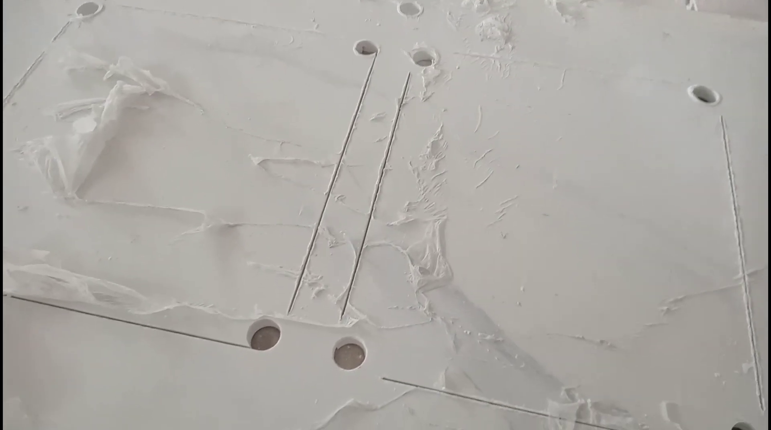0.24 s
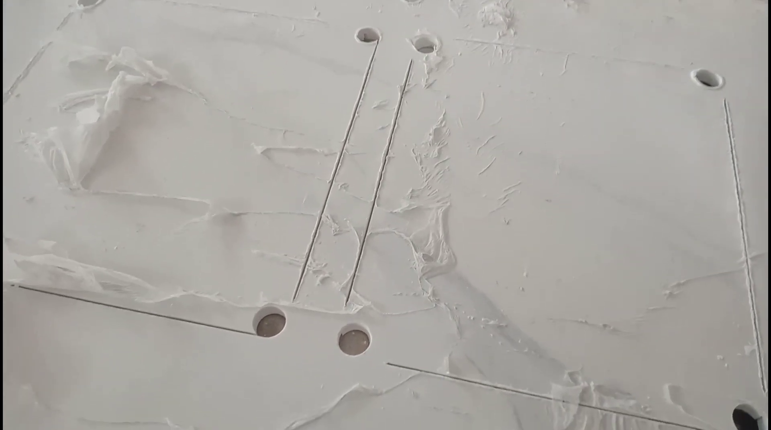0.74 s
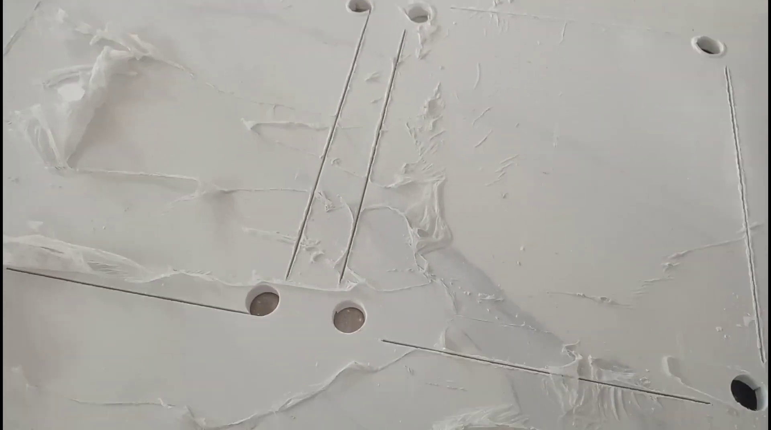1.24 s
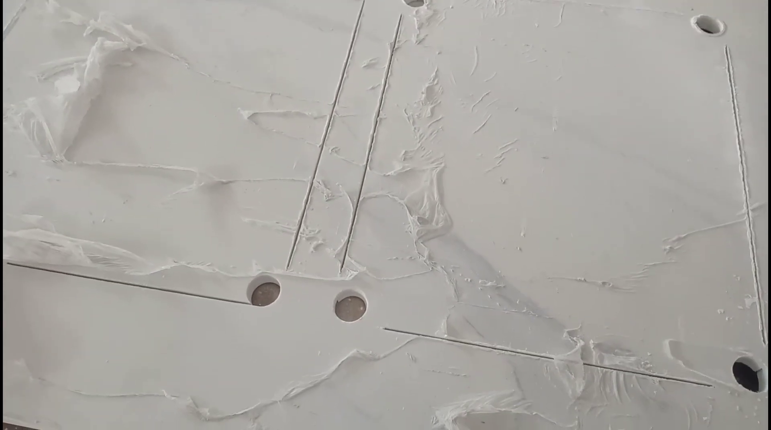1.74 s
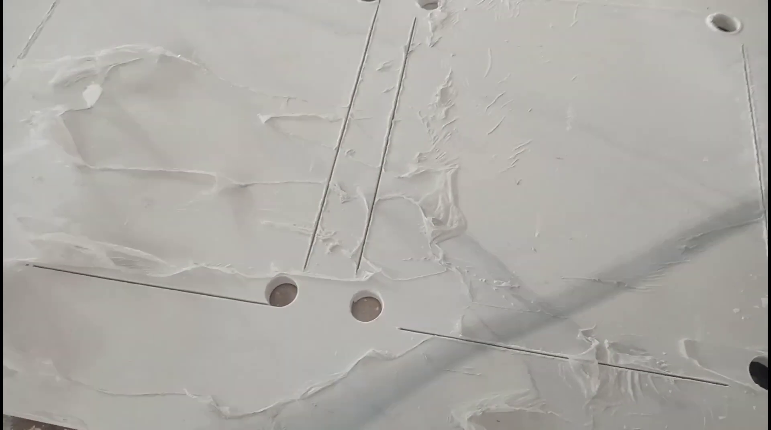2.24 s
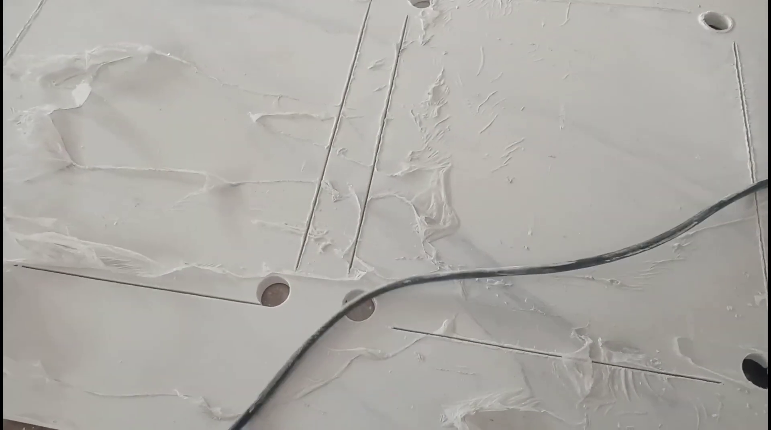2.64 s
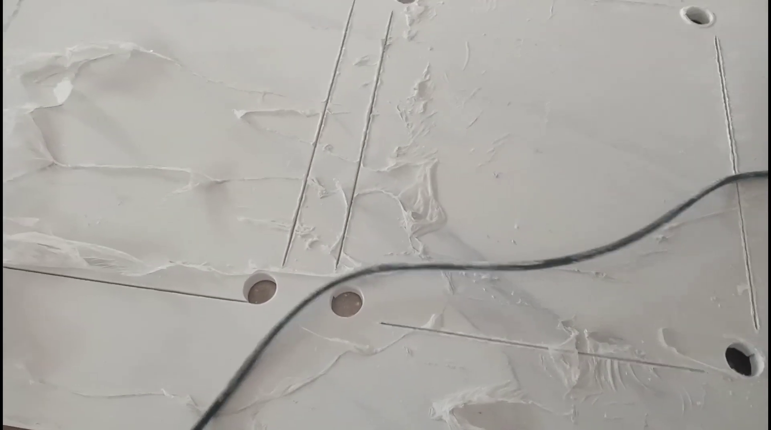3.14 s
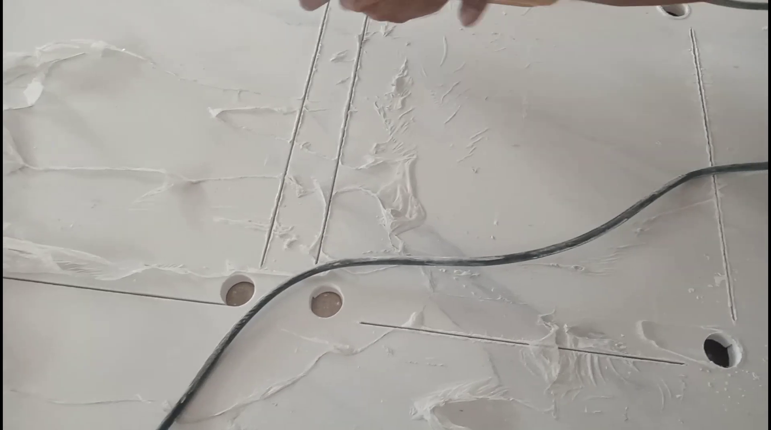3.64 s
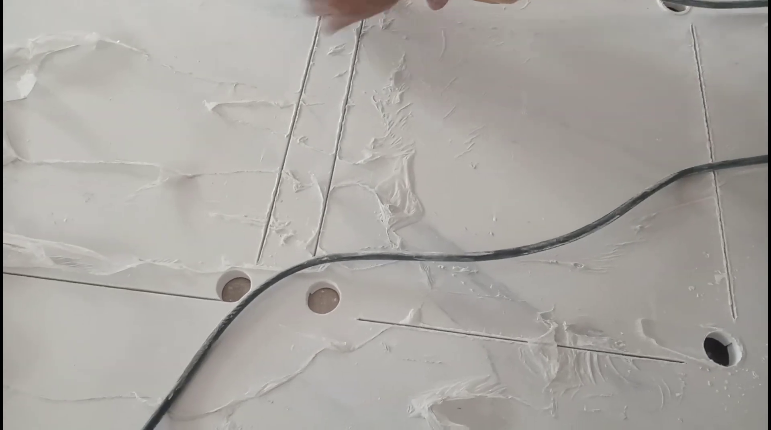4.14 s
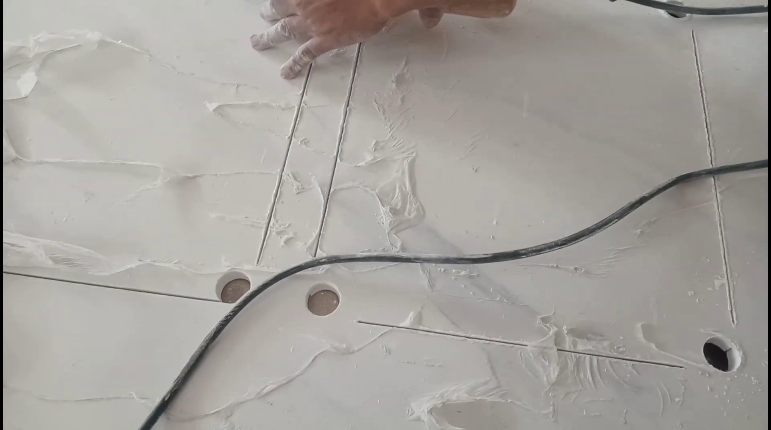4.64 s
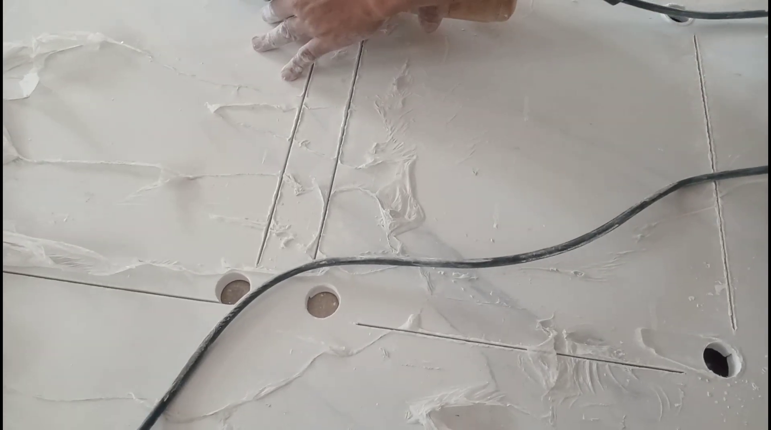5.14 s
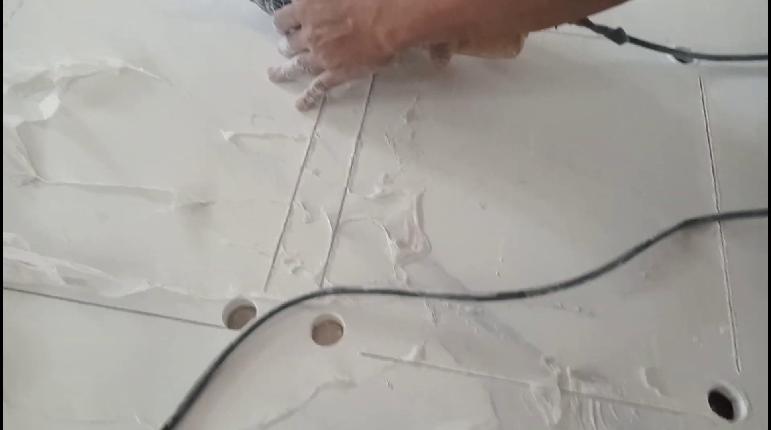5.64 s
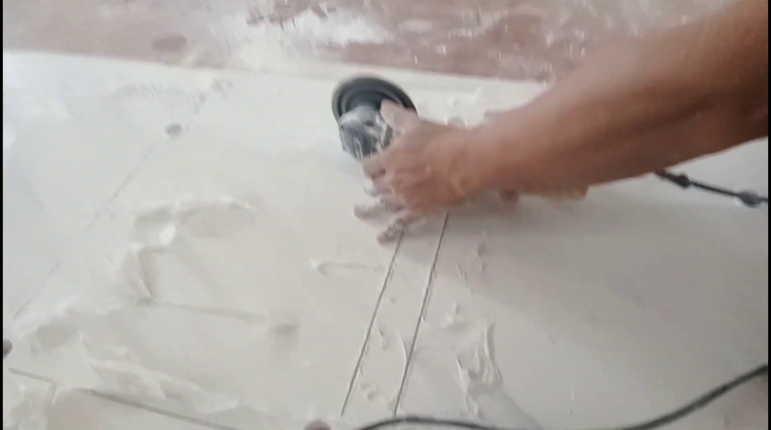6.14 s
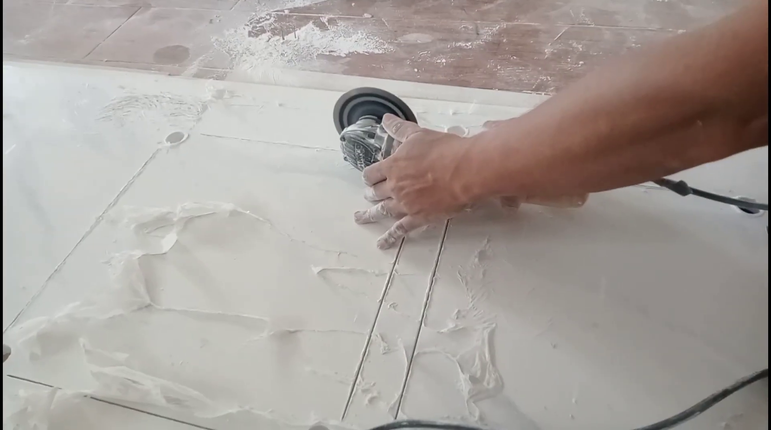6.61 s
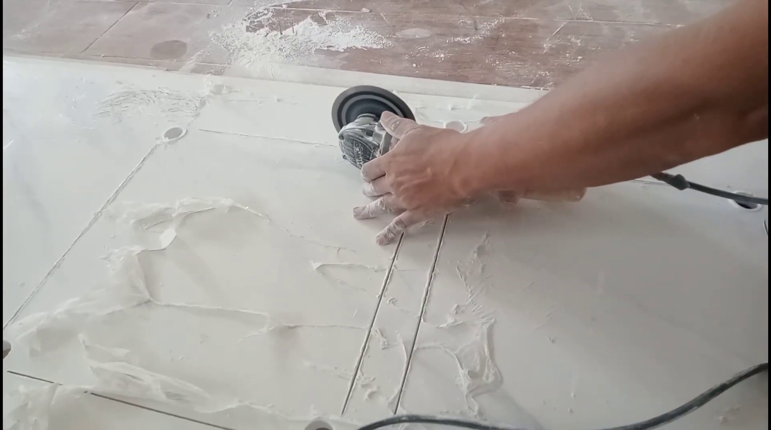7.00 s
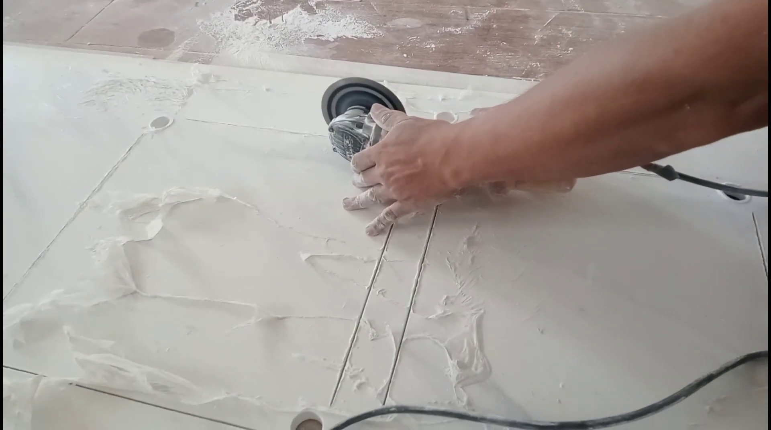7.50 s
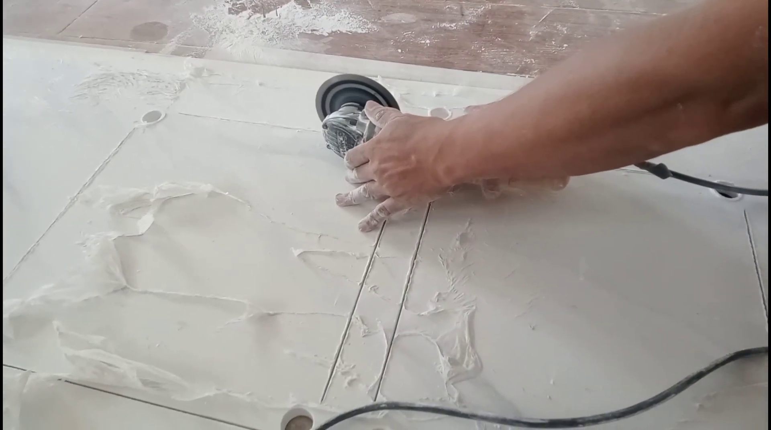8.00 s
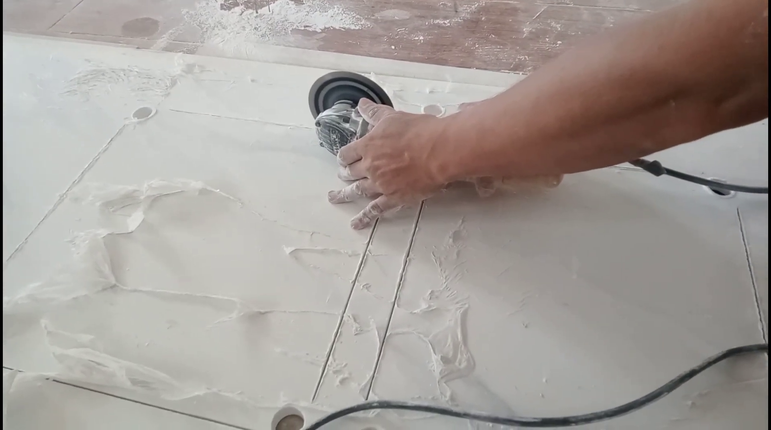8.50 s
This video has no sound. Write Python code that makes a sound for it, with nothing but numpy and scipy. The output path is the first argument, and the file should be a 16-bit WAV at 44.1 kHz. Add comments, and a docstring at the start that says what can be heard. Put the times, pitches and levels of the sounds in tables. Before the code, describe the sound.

An angle grinder near the microphone slows over nearly four seconds, its whine sinking and its loose gears rattling ever more sparsely, with faint handling rumble. A sharp knock and jolt switch it on, and it surges into a loud steady roar with high whistle and hiss. The disc lightly touches stone, then cuts with harsh metallic ringing. The machine has a short diffuse room echo; the cutting sounds dry and close.

```python
"""In a bare room, over a stone slab, an angle grinder coasts to rest: its whine falls and slack gears rattle.
Just after it stops it is switched on with a kick, runs up to speed, skims the stone and bites in.
Gears are random impacts through resonances, shafts are sums of harmonics, air and hiss are filtered noise;
the disc is a set of narrow modes, shaken by the gears while coasting and by grit noise while cutting.
A diffuse room tail follows gears, fan, brushes, loose disc and whistle; hum, handling and cutting stay dry."""
import sys
import numpy as np
from scipy import signal
from scipy.fft import rfft, irfft
from scipy.io import wavfile
from scipy.ndimage import uniform_filter1d, minimum_filter1d

SR = 44100
rng = np.random.default_rng(int(sys.argv[2]) if len(sys.argv) > 2 else 0)


def to_wav(s):
    """Save 16-bit WAV."""
    ch = np.atleast_2d(s).T  # columns
    pcm = np.round(np.clip(ch, -1, 1) * 32767)  # PCM
    wavfile.write(sys.argv[1], SR, pcm.astype(np.int16))


N = 386316
TIME = np.arange(N) / SR

# Harmonics of a shaft, levels before the gain of their source: (multiple of shaft speed, level [dB])
COAST_ORDERS = [(1, -53), (24, -52)]
FAN_ORDERS = [(4, -38.5), (8, -40)]
ARMATURE_ORDERS = [(1, -45), (2, -41), (3, -72), (6, -33.5)]
SPINDLE_ORDERS = [(1, -62.5), (2, -50.5)]
RUB_ORDERS = [(3, -45), (9, -39), (13, -32), (21, -45)]

# Blows in the gear head: (time [s], relative level [dB], share of dull casing thud [0-1])
KNOCKS = [(1.239, -20, 0.2), (1.968, -22.5, 0.2), (2.438, -12.5, 0.14), (2.558, -6.5, 0.8),
          (3.985, -1, 0.67), (4.054, -10, 0.1), (4.077, -12.5, 0.05), (4.106, -7.5, 0.26),
          (4.116, -14, 0.2), (4.14, -10, 0.34)]
# Soft bumps of handling: (time [s], length [s], rms level at the crest [dB])
BUMPS = [(0.227, 0.021, -42), (2.312, .03, -44), (2.356, 0.03, -38.5), (3.87, 0.24, -45)]
# Flurries of the gears: (time [s], length [s], boost [dB])
FLURRIES = [(1.22, 0.11, 1), (1.98, .04, 1.5), (2.08, .05, 3), (2.55, 0.34, 4), (3.0, .22, 2),
            (3.48, 0.42, 3), (4.015, 0.056, 3), (4.11, .09, 3.5), (4.68, 0.14, 1.2), (5.66, 0.13, 1.5)]
# The loose disc rings out: (time [s], length [s], relative lower-mode level [dB], relative upper-mode level [dB])
RINGS = [(0.183, 0.12, -27, -30), (0.416, .07, -23, -30), (.66, 0.071, -24, -34), (1.045, 0.045, -30, -24),
         (1.178, 0.048, -21, -33), (1.448, 0.033, -30, -19.5), (1.58, 0.044, -44, -23),
         (2.553, 0.085, -38, -23), (2.787, 0.1, -27, -30.5), (2.907, 0.016, -44, -17),
         (3.048, .06, -27.5, -48), (3.41, 0.16, -56, -34.5), (3.74, .06, -60, -41)]
# The spindle's hum swells: (time [s], length [s], boost [dB])
HUM_SWELLS = [(5.2, 0.44, 11.5), (5.65, 0.36, 11), (6.3, 0.61, 5), (7.3, 0.69, 9.5)]
# The disc grabs in the cut and sings louder: (time [s], length [s], boost [dB])
GRABS = [(7.16, .06, 2.5), (7.25, 0.044, 4.5), (7.355, 0.048, 6), (7.64, 0.2, 3), (8.25, 0.089, 1),
         (8.7, 0.065, 1)]

# Two strong modes of the disc: (frequency [Hz], width [Hz], relative level [dB])
DISC_LOW = [(2151, 79, 0)]
DISC_HIGH = [(2596, 40, 0)]
# Further modes of the disc, shaken loose, skimming, biting, and its highest: same columns,
# (frequency [Hz], width [Hz], relative level [dB])
DISC_OVERTONES = [(6330, 220, -38), (7220, 130, -34), (7900, 110, -38), (8100, 70, -42), (9220, 400, -40),
                  (11050, 200, -52)]
DISC_SKIMMING = [(4765, 30, -19), (10660, 50, -32), (14490, 120, -46)]
DISC_BITING = [(2194, 42, 0), (6046, 40, -30), (6225, 55, -24), (6462, 45, -28), (8090, 35, -36),
               (8452, 20, -29), (9850, 160, -32), (10654, 60, -33), (11854, 60, -38), (13060, 80, -48)]
DISC_SHRILL = [(12640, 60, -70), (14480, 60, -64), (15180, 120, -65)]
# Modes of the casing, of the start-up jolt and of the brushes: (frequency [Hz], width [Hz], relative level [dB])
CASING = [(1273, 175, -23.5), (3000, 380, -16)]
JOLT_MODES = [(290, 150, -5), (2192, 54, 21.5)]
BRUSH_MODES = [(10200, 420, -4), (10840, 330, 3), (11400, 400, -2), (12100, 400, -7)]

# Spectral shapes, later scaled to unit power: (frequency [Hz], relative level per Hz [dB])
SLACK_GEARS = [(30, -47), (200, -35), (400, -32.5), (700, -12.5), (1200, -8), (1500, -7), (2300, -1),
               (2850, 1.5), (3350, 0.5), (3750, -6.5), (4100, -19), (5200, -29.5), (6800, -41.5),
               (10000, -42.5), (13000, -50)]
DRIVEN_GEARS = [(40, -49), (700, -42), (1500, -13), (2050, -9), (2450, 0.5), (3100, 1.5), (3550, 2.5),
                (3900, -1), (4200, -8.5), (4700, -16.5), (5100, -26), (5600, -23.5), (7000, -41.5),
                (15000, -56)]
FAN = [(30, -56), (100, -37.5), (200, -21.5), (400, -19), (550, -11), (760, 1), (920, -2), (1100, 2.5),
       (1300, 3.5), (1400, -4), (1640, 5.5), (1740, 0.5), (1900, 2.5), (2600, 2), (4500, -39.5)]
HISS = [(300, -37), (3000, -22), (5500, -0.5), (7300, 1), (9200, 1.5), (9750, 2), (10200, 0.5),
        (11000, -3.5), (12200, -12), (13000, -15), (15300, -14)]
THUD = [(40, -61), (150, -23), (350, 5), (600, 16), (900, 23), (1400, 8.5), (3200, 13.5), (4500, -61),
        (12000, -57)]
RUMBLE = [(25, -18), (45, -23), (85, -1), (170, -1), (300, -10), (1000, -9.5), (5000, -49), (15000, -47)]
BUMP_TONE = [(25, -26), (60, -4), (110, 0), (220, -9.5), (500, -27), (3000, -70)]
COASTING_AIR = [(50, -30), (400, -13), (800, 1), (4500, 1.5), (8000, -2.5), (12000, -13), (15000, -30)]

PINION_TEETH, CROWN_TEETH = 9, 32
ROOM_T60_S, CUTOFF_HZ = 0.59, 15450
# coasting: bearing friction (turns per s lost each second) and air drag (time constant)
FRICTION_HZ_PER_S, DRAG_S, STOP_S = 67.743, 11.7735, 3.861
# run-up: a quick surge, then a slow approach to the top speed (turns per s)
SWITCH_ON_S, TOP_HZ, SURGE_SHARE, SURGE_S, APPROACH_S = 3.984, 653.9, .47, .0707, .607
# load: from this time on the stone drags the speed down
SAG_AT_S, SAG_HZ, SAG_S = 7.35, 10, .5
# the tool is carried to the slab, skims it, bites in and is pressed down
MOVE_S, SKIM_S, BITE_S, PRESS_S = 5.7, 6.03, 7.04, 7.52
# relative levels while coasting
CHATTER_SPREAD_DB, RATTLE_DB, VANES_DB, AIR_DB, SHIMMER_DB = 1, -21.5, -2, -42.5, -28.5
LOW_RING_DB, HIGH_RING_DB, RING_FLUTTER_DB = -33, -32.5, 4.5
# relative levels under power, and the change of each once the tool is moved
GEAR_DB, FAN_DB, HISS_DB = -14, -21, -38
GEAR_MOVED_DB, FAN_MOVED_DB, HISS_MOVED_DB = -1, -3, -2.8
# the brushes catch once a turn, at this angle (turns) before rest, in the last turns
CATCH_TURNS, CATCH_COUNT = .045, 15
CATCH_DB, CATCH_LOUDEST_HZ, CATCH_DB_PER_OCTAVE = -47, 11, 7.5


def from_db(db):
    """Logarithmic level: decibels to amplitude gain."""
    return np.exp(np.asarray(db) * (np.log(10) / 20))


def rms_one(x):
    """Normalization: scale to unit rms."""
    return x / np.sqrt(np.mean(x ** 2) + 1e-20)


def drift(rate):
    """Low-passed noise: a smooth random course of rms 1 that changes about rate times a second."""
    pole = np.exp(-40 * np.pi * rate / SR)
    noise = rng.standard_normal(N // 20 + 4002)
    # one value per 20 samples, with the filter's onset discarded
    slow = signal.lfilter([1], [1, -2 * pole, pole * pole], noise)[4000:]
    return np.interp(np.arange(N) / 20, np.arange(len(slow)), rms_one(slow))


def ramp(start_s, length_s):
    """Linear transition: rises from 0 to 1 and stays."""
    return np.clip((TIME - start_s) / length_s, 0, 1)


def swell(centre_s, length_s):
    """Gaussian envelope: a bell of height 1, length_s wide at half height."""
    return .5 ** ((2 * (TIME - centre_s) / length_s) ** 2)


def swells(rows):
    """Superposition of bells given as (time [s], length [s], height)."""
    return sum(height * swell(s, length) for s, length, height in rows)


def with_speed(speed, full_hz, db_per_octave, least_hz=10):
    """Power law: gain grows with speed between least_hz and full_hz, where it reaches 1."""
    octaves = np.log2(np.clip(speed, least_hz, full_hz) / full_hz)
    return from_db(db_per_octave * octaves)


def colour(x, spectrum, size=4096):
    """Minimum phase: a causal filter of unit power, made through the cepstrum, follows a spectrum."""
    hz, db = np.transpose(spectrum)
    bins = np.fft.rfftfreq(size, 1 / SR)
    gain = from_db(np.interp(np.log(bins + 1), np.log(hz), db))
    # fold the cepstrum onto positive times
    cepstrum = irfft(np.log(gain))
    cepstrum[1:size // 2] *= 2
    cepstrum[size // 2 + 1:] = 0
    response = irfft(np.exp(rfft(cepstrum)))
    return signal.oaconvolve(x, response / np.linalg.norm(response))[:N]


def resonate(x, modes, flutter_db=0):
    """Modal superposition: unit white noise brings each mode to its level; the drive of each may flutter."""
    out = np.zeros(N)
    for hz, width, db in modes:
        band = signal.butter(2, [hz - width / 2, hz + width / 2], "band", fs=SR, output="sos")
        push = x * from_db(flutter_db * drift(27)) if flutter_db else x
        out += from_db(db) * np.sqrt(SR / 2 / width) * signal.sosfilt(band, push + 1e-18)
    return out


def steady(x, seconds):
    """Short-time power normalization: evens out slow swells, keeping the quick ones."""
    power = np.abs(uniform_filter1d(x * x, int(seconds * SR)))
    return x / np.sqrt(power + 1e-9)


def bursts(times, heights, t60):
    """Exponential decay: short crunches of contact noise fall 60 dB in t60 seconds."""
    starts = np.zeros(N)
    starts[np.round(np.asarray(times) * SR).astype(int)] = heights
    envelope = signal.lfilter([1], [1, -from_db(-60 / (t60 * SR))], starts + 1e-18)
    return envelope * rng.standard_normal(N)


def tones(shaft_hz, orders, flutter_db, jitter):
    """Harmonic series of a rotation: each order wavers in strength, all share one wavering pitch."""
    angle = 2 * np.pi * np.cumsum(shaft_hz * (1 + jitter * drift(28.6))) / SR
    out = np.zeros(N)
    for order, db in orders:
        out += np.sqrt(2) * from_db(db + flutter_db * drift(27)) * np.sin(order * angle)
    return out


def room(x, wet_db):
    """Diffuse reverberation: direct sound plus a slowly turning blend of two decaying noise tails."""
    t = TIME[:SR // 2]
    tails = rng.standard_normal((2, len(t))) * from_db(-60 * t / ROOM_T60_S) * (t > .004)
    first, second = (signal.oaconvolve(x, tail / np.linalg.norm(tail))[:N] for tail in tails)
    # the blend turns about once in 3 s
    place = 2 * np.pi * TIME / 3 + drift(1)
    wet = from_db(wet_db)
    return (x + wet * (np.cos(place) * first + np.sin(place) * second)) / np.hypot(1, wet)


def coast_speed():
    """Retardation by constant friction and proportional drag: turns per s of the unpowered armature."""
    return FRICTION_HZ_PER_S * DRAG_S * np.expm1(np.maximum(STOP_S - TIME, 0) / DRAG_S)


def armature_speed():
    """Exponential relaxation, in turns per s: coasts to rest, runs up, and sags under load."""
    on, loaded = np.maximum(TIME - SWITCH_ON_S, 0), np.maximum(TIME - SAG_AT_S, 0)
    run_up = 1 - SURGE_SHARE * np.exp(-on / SURGE_S) - (1 - SURGE_SHARE) * np.exp(-on / APPROACH_S)
    return coast_speed() + TOP_HZ * run_up - SAG_HZ * (1 - np.exp(-loaded / SAG_S))


def tooth_impacts(speed, spread_db, clump_db):
    """Random impact process at the meshing rate, with a least rate for bouncing; strengths vary and clump."""
    strikes = rng.random(N) < PINION_TEETH * np.maximum(speed, 110) / SR
    strength_db = spread_db * np.clip(rng.standard_normal(N), -3, 2.5) + clump_db * drift(35)
    return steady(strikes * from_db(strength_db) * rng.choice([-1, 1], N), 0.11)


def handling():
    """Broadband low-frequency noise: rumble of hands and cable that calms after the run-up, with soft bumps."""
    bump_gain = swells((s, length, from_db(db)) for s, length, db in BUMPS)
    bumps = bump_gain * colour(rng.standard_normal(N), BUMP_TONE)
    rumble_gain = from_db(-51.5 - 7.5 * ramp(4.4, 2.9))
    return rumble_gain * colour(rng.standard_normal(N), RUMBLE) + bumps


def loose_disc(impacts, speed):
    """Forced modal vibration: clatter shakes two strong modes, which flutter and ring out, and the overtones."""
    shaking = with_speed(speed, full_hz=302, db_per_octave=4.5)
    low_rings = swells((s, length, from_db(db)) for s, length, db, _ in RINGS)
    high_rings = swells((s, length, from_db(db)) for s, length, _, db in RINGS)
    low_gain = shaking * from_db(LOW_RING_DB + RING_FLUTTER_DB * drift(8.2)) + low_rings
    high_gain = shaking * from_db(HIGH_RING_DB + RING_FLUTTER_DB * drift(20)) + high_rings
    low = from_db(-5.0) * low_gain * steady(resonate(impacts, DISC_LOW), 0.044)
    high = from_db(-1.5) * high_gain * steady(resonate(impacts, DISC_HIGH), 0.043)
    shimmer_gain = from_db(SHIMMER_DB + 4 * swell(.45, .5))
    shimmer_gain = shimmer_gain * with_speed(speed, full_hz=114, db_per_octave=11.5)
    return low + high + shimmer_gain * resonate(impacts, DISC_OVERTONES, flutter_db=6.0)


def coasting(speed):
    """Impact excitation and rotation: unloaded gears clatter under the falling whine and the dying fan."""
    impacts = tooth_impacts(speed, CHATTER_SPREAD_DB, clump_db=1.7)
    rattle_gain = from_db(RATTLE_DB + swells(FLURRIES))
    rattle_gain = rattle_gain * with_speed(speed, full_hz=303, db_per_octave=5.5)
    gears = rattle_gain * (colour(impacts, SLACK_GEARS) + resonate(impacts, CASING, flutter_db=4.5))
    whine = tones(speed, COAST_ORDERS, flutter_db=3.0, jitter=0.0017)
    # turbulence blurs the fan's tones into narrow bands
    vanes = from_db(VANES_DB) * tones(speed, FAN_ORDERS, flutter_db=1.5, jitter=0.0198) * drift(70)
    tonal = with_speed(speed, full_hz=199, db_per_octave=34) * (whine + vanes)
    air_gain = from_db(AIR_DB) * with_speed(speed, full_hz=310, db_per_octave=13.5)
    air = air_gain * colour(rng.standard_normal(N), COASTING_AIR)
    return (gears + tonal + air + loose_disc(impacts, speed)) * (TIME < SWITCH_ON_S)


def knocks():
    """Impulsive excitation: hard single blows in the gear head; the duller the blow, the less bright snap."""
    s, db, dull = np.transpose(KNOCKS)
    sharp = bursts(s, from_db(db + 3.5) * (1 - dull), t60=0.028)
    thud = bursts(s, from_db(db - 7.5) * dull, t60=0.038)
    snap = bursts(s, from_db(db - 20) * (1 - dull) ** 6, t60=.02)
    return colour(sharp, SLACK_GEARS) + resonate(snap, [(5600, 1800, 0)]) + colour(thud, THUD)


def brushes():
    """Once-per-turn excitation: a tiny high chirp on each of the last turns, uneven, loudest at a crawl."""
    speed = coast_speed()
    turns_left = np.cumsum(speed[::-1])[::-1] / SR
    at = np.searchsorted(-turns_left, -(CATCH_TURNS + np.arange(CATCH_COUNT)))
    octaves_off = np.abs(np.log2(np.maximum(speed[at], 5) / CATCH_LOUDEST_HZ))
    db = CATCH_DB - CATCH_DB_PER_OCTAVE * octaves_off + 2.5 * rng.standard_normal(len(at))
    catches = bursts(at / SR, from_db(db), t60=0.055)
    return resonate(catches, BRUSH_MODES) + resonate(catches, [(13500, 2300, -11)])


def driven(speed):
    """Loaded impacts and turbulence: gears slam out their backlash and roar, the fan rushes, brushes hiss."""
    slack, moved = np.clip(1 - speed / 480, 0, 1), ramp(MOVE_S, 0.07)
    impacts = tooth_impacts(speed, spread_db=4.5 + 5 * slack, clump_db=1.3)

    gear_gain = from_db(GEAR_DB + GEAR_MOVED_DB * moved + swells(FLURRIES))
    gear_gain = gear_gain * with_speed(speed, full_hz=560, db_per_octave=8.5, least_hz=293)
    gears = gear_gain * colour(impacts, DRIVEN_GEARS)

    fan_gain = from_db(FAN_DB + FAN_MOVED_DB * moved - 1.6 * ramp(BITE_S, 1.6))
    fan_gain = fan_gain * with_speed(speed, full_hz=590, db_per_octave=5.0, least_hz=420)
    fan = fan_gain * colour(rng.standard_normal(N), FAN)

    # grit adds to the hiss once the disc meets the stone
    hiss_gain = from_db(HISS_DB + HISS_MOVED_DB * moved + 2.3 * ramp(SKIM_S, 0.61))
    hiss_gain = hiss_gain * with_speed(speed, full_hz=417, db_per_octave=15, least_hz=190)
    hiss = hiss_gain * colour(impacts + rng.standard_normal(N), HISS) / np.sqrt(2)

    jolt_gain = from_db(-18.5) * swell(SWITCH_ON_S + .075, 0.17)
    jolt = jolt_gain * steady(resonate(impacts, JOLT_MODES), 0.048)
    return (gears + fan + hiss + jolt) * (TIME >= SWITCH_ON_S)


def hum(speed):
    """Rotating unbalance: tones of both shafts grow with speed; on the stone, rubbing adds spindle orders."""
    spindle = speed * PINION_TEETH / CROWN_TEETH
    skim, pressed = ramp(SKIM_S, 0.51), ramp(PRESS_S, 0.1)
    armature_gain = from_db(3.5 - 3.9 * ramp(PRESS_S, 1.2))
    armature_gain = armature_gain * with_speed(speed, full_hz=650, db_per_octave=38)
    spindle_gain = from_db(-7.5 + swells(HUM_SWELLS)) * with_speed(speed, full_hz=605, db_per_octave=68)
    rub_gain = from_db(-15) * skim + from_db(-2.0) * pressed
    note_gain = from_db(-37) * skim + from_db(-35.5) * pressed + from_db(-27) * swell(8.04, .45)
    sound = armature_gain * tones(speed, ARMATURE_ORDERS, flutter_db=1.5, jitter=0.0013)
    sound += spindle_gain * tones(spindle, SPINDLE_ORDERS, flutter_db=2.5, jitter=.001)
    sound += rub_gain * tones(spindle, RUB_ORDERS, flutter_db=3.5, jitter=0.00089)
    sound += note_gain * tones(spindle, [(14, 1)], flutter_db=1.5, jitter=.0012)
    return sound * (TIME >= SWITCH_ON_S)


def squeals(speed):
    """Commutation and friction tones: a rising whistle and a passing thin brush squeal that climbs with speed."""
    squeal_hz = 9800 - 1.3 * np.clip(575 - speed, 0, 270)
    whistle = tones(speed, [(25, 0)], flutter_db=2.5, jitter=.001)
    squeal = tones(squeal_hz, [(1, 0)], flutter_db=3, jitter=.005)
    whistle_gain = from_db(-47.5) * with_speed(speed, full_hz=420, db_per_octave=30)
    squeal_gain = from_db(-43.5) * swell(4.62, 0.43)
    return (whistle_gain * whistle + squeal_gain * squeal) * (TIME >= SWITCH_ON_S)


def cutting():
    """Friction-driven modes: grit makes the disc sing thinly skimming, fully biting, its upper mode pressed."""
    skim, bite, pressed = ramp(SKIM_S, .7), ramp(BITE_S, 0.071), ramp(PRESS_S, .2)
    grit = rng.standard_normal(N)
    thin = skim * from_db(-16.0 - 5 * ramp(7.35, 0.28)) * resonate(grit, DISC_SKIMMING)
    singing_gain = (from_db(-32.5) * skim + from_db(-23.0) * bite) * from_db(swells(GRABS))
    singing = singing_gain * steady(resonate(grit, DISC_BITING), .1)
    upper = from_db(-29) * pressed * resonate(grit, DISC_HIGH, flutter_db=2)
    # the highest overtones last as long as the disc touches the stone
    shrill = skim * resonate(grit, DISC_SHRILL, flutter_db=2)
    return thin + singing + upper + shrill


def scene():
    """Superposition: one armature speed drives the machine; hum, handling, cutting and floor noise stay dry."""
    speed = armature_speed()
    machine = room(coasting(speed) + knocks() + brushes() + driven(speed) + squeals(speed), wet_db=-6)
    floor = from_db(-70.0) * rng.standard_normal(N)
    return (handling() + machine + hum(speed) + cutting() + floor)[None]


def record(dry):
    """Peak limiting and low-pass filtering: a quick limiter holds the highest peaks, then the top is cut."""
    width = int(.002 * SR)
    allowed = np.minimum(1, .88 / (np.abs(dry) + 1e-9))
    limited = dry * uniform_filter1d(minimum_filter1d(allowed, width), width)
    low_pass = signal.ellip(16, .1, 90, CUTOFF_HZ, fs=SR, output="sos")
    return signal.sosfilt(low_pass, limited)


dry = scene()
out = record(dry)
to_wav(out)
```